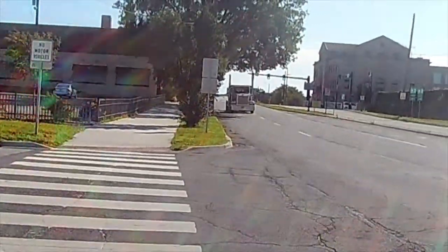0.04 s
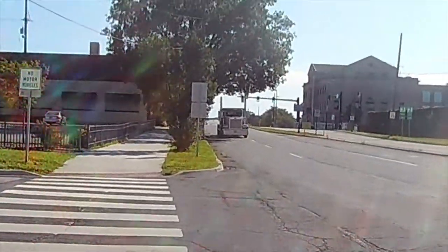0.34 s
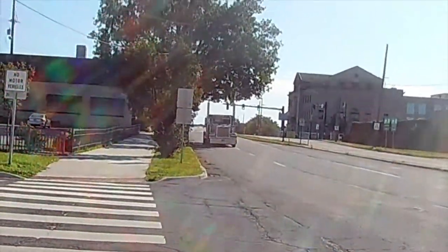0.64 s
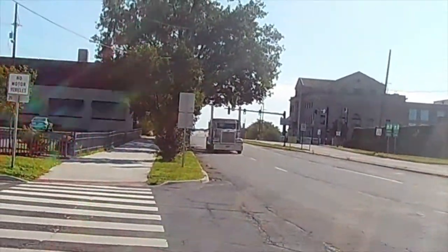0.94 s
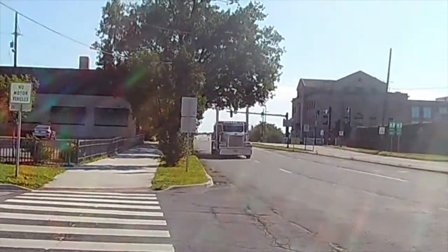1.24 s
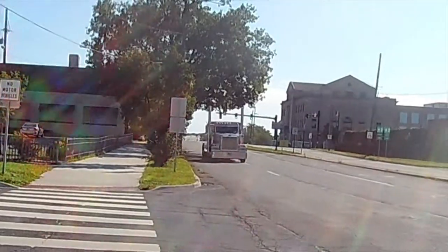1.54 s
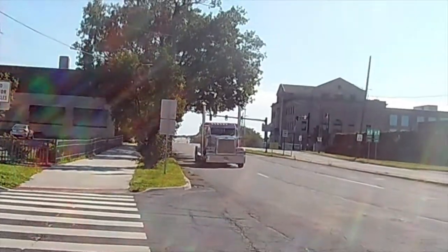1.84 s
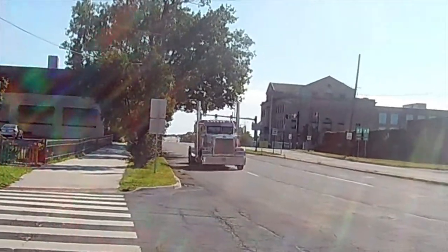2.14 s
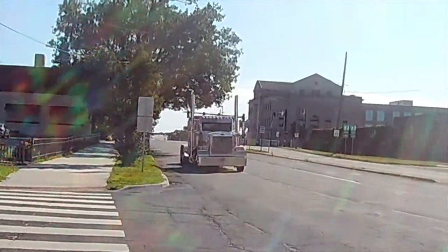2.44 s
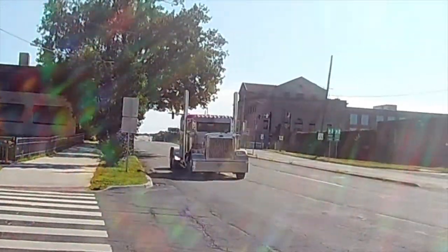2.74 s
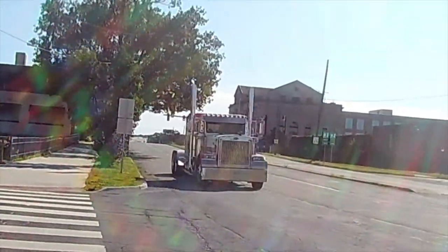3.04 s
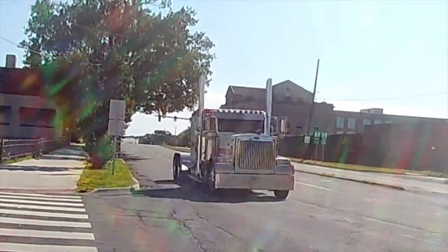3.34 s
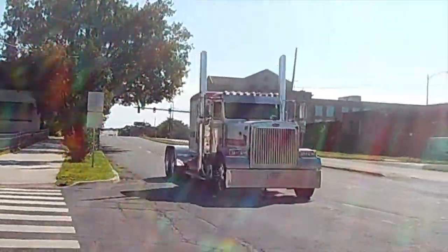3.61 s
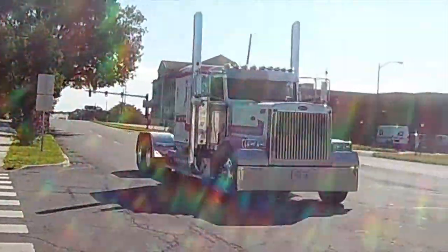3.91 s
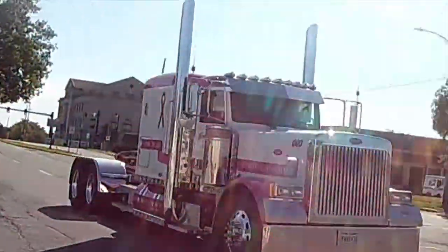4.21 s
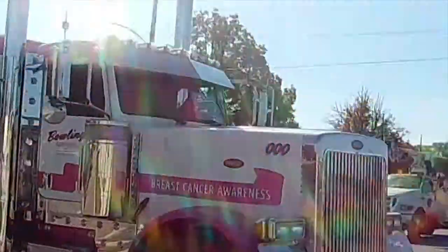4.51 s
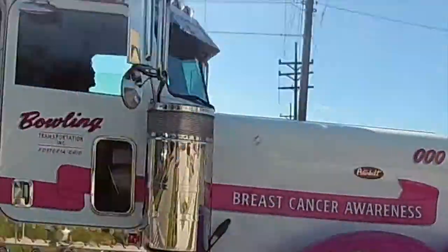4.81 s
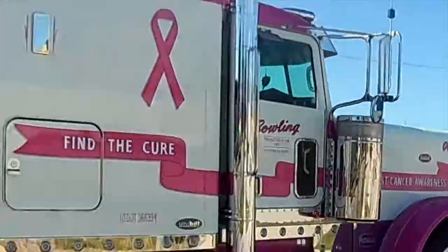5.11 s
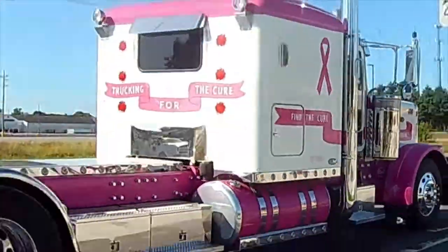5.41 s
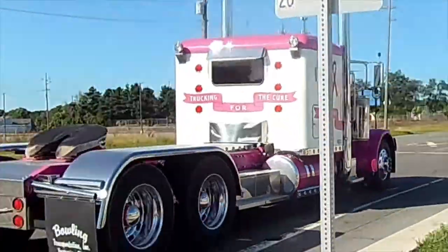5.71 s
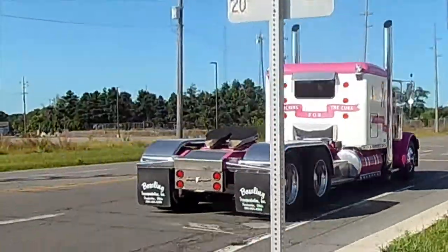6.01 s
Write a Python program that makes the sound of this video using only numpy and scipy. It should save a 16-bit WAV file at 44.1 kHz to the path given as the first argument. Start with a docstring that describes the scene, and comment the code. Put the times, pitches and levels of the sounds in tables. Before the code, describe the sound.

A diesel semi-truck approaches, gives one long, harshly distorted air horn blast, and drones past close by.

```python
"""A town road between house fronts, one microphone about 3.5 m from the path of a semi-truck.
The truck drives up and passes, its six-cylinder diesel droning over tyre roar and a thin turbo whistle.
Just before it draws level it sounds a three-trumpet air horn, so loud that the microphone overloads
into a harsh, buzzing chord; a hollow howl follows with the rear wheels. Earlier a far car gives one
short toot and there is a brief, high squeak. Light wind bumps the microphone."""
import sys
import numpy as np
from scipy import signal
from scipy.fft import rfft, irfft, next_fast_len
from scipy.io import wavfile

SR = 44100
rng = np.random.default_rng(int(sys.argv[2]) if len(sys.argv) > 2 else 0)


def dump_mix(stems):
    """Bounce the given channels to the path in sys.argv[1] as a 16-bit WAV at rate SR."""
    frames = np.atleast_2d(stems).T  # one column per channel
    limited = np.clip(frames, -1, 1)  # hard clip at full scale
    pcm = np.round(limited * 32767).astype(np.int16)
    wavfile.write(sys.argv[1], SR, pcm)


N = 267246
TIME = np.arange(N) / SR
PASS_S, SPEED_M_PER_S, DISTANCE_M = 4.638, 10.97, 3.46   # the cab is abreast and closest at PASS_S
VALVE_OPENS_S, VALVE_CLOSES_S, RELEASE_S = 3.553, 4.805, 0.083   # the horn's air supply
WHISTLE_WANDER = .01   # share of the pitch


def from_db(db):
    """Decibels to gain."""
    return 10 ** (np.asarray(db) / 20)


def rms_one(x):
    """Scale to unit power."""
    return x / np.sqrt(np.mean(x ** 2) + 1e-20)


def in_time(rows):
    """Each column of a timed curve at every sample."""
    times_s, *columns = np.transpose(rows)
    return [np.interp(TIME, times_s, column) for column in columns]


def at_hz(points, hz):
    """Read a spectrum on a log-frequency axis."""
    points_hz, db = np.transpose(points)
    return np.interp(np.log(np.maximum(hz, 1)), np.log(points_hz), db)


def coloured(x, spectrum):
    """Give a sound a smooth colour."""
    size = next_fast_len(N + 4096)
    bins_hz = np.arange(size // 2 + 1) * SR / size
    return irfft(rfft(x, size) * from_db(at_hz(spectrum, bins_hz)), size)[:N]


def noise(spectrum):
    """Coloured noise of unit power."""
    return rms_one(coloured(rng.standard_normal(N), spectrum))


def band(x, low_hz, high_hz):
    """Butterworth band-pass."""
    return signal.sosfilt(signal.butter(3, [low_hz, high_hz], "band", fs=SR, output="sos"), x)


def drift(rate_hz):
    """A smooth random wander with spread 1."""
    step = 40   # samples
    pole = np.exp(-2 * np.pi * step * rate_hz / SR)
    white = rng.standard_normal(N // step + 2002)
    slow = signal.lfilter([1], [1, -2 * pole, pole * pole], white)[2000:]
    return np.interp(np.arange(N) / step, np.arange(len(slow)), rms_one(slow))


def turning(hz):
    """Phase of an oscillation with a moving frequency and a random start."""
    return 2 * np.pi * (np.cumsum(hz) / SR + rng.random())


def tone(phase, db):
    """A sine with the given rms level."""
    return np.sqrt(2) * from_db(db) * np.sin(phase)


def whistle(hz, blur_hz):
    """A flickering, narrow band of noise around a slightly unsteady pitch."""
    phase = turning(hz * (1 + WHISTLE_WANDER * drift(6)))
    narrow = signal.butter(2, blur_hz, fs=SR, output="sos")
    in_phase, quadrature = rms_one(signal.sosfilt(narrow, rng.standard_normal((2, N))))
    return in_phase * np.cos(phase) + quadrature * np.sin(phase)


def microphone_hiss(level_db=-71):
    """The microphone's own faint noise floor."""
    # hiss spectrum: frequency_hz, density_db
    colour = [(100, 2.5), (5000, -0.5), (7000, -5), (9000, -3), (15000, 7)]
    return from_db(level_db) * noise(colour)


def wind(gain_db=7.0):
    """Wind on the microphone: a low flutter with a few sharper buffets."""
    # strength of the flutter: time_s, relative_db
    strength = [(0.08, -38), (0.54, -40.5), (0.62, -37), (1.78, -42), (2.37, -38.5), (4.32, -31),
                (4.88, -33), (5.01, -44), (6.0, -34.5)]
    # buffets: peak_s, level_db, width_s
    buffets = [(0.131, -32.5, 0.035), (0.681, -32.5, 0.022), (0.746, -31.5, 0.02), (0.83, -41, 0.02),
               (0.913, -33, 0.035), (1.312, -31, 0.014), (1.99, -31, 0.071), (2.162, -35, 0.032)]
    # spectra of flutter and buffets: frequency_hz, density_db
    flutter_colour = [(20, -5), (45, 15.5), (70, 13.5), (120, 6), (200, -1.5), (400, -26), (1200, -55),
                      (4000, -87)]
    buffet_colour = [(30, -16), (70, -19), (130, 17), (250, 5.5), (450, 3.5), (800, -20), (2000, -45),
                     (5000, -90)]
    flutter = from_db(in_time(strength)[0] + gain_db) * noise(flutter_colour)
    bumps = sum(from_db(db) * np.exp(-.5 * ((TIME - s) / width) ** 2) for s, db, width in buffets)
    return flutter + bumps * noise(buffet_colour)


def far_toot(centre_s=1.195, half_length_s=.035, pitch_hz=500):
    """A tap on a distant car horn: one note and its octave."""
    phase = 2 * np.pi * pitch_hz * TIME
    gate = np.exp(-((TIME - centre_s) / half_length_s) ** 4)
    return gate * (tone(phase, db=-39.5) + tone(2 * phase, db=-41.5))


def ticks(decay_s=0.0011):
    """Tiny dry, bright clicks, most of them as the horn cuts off."""
    # clicks: start_s, level_db
    clicks = [(0.098, -41), (4.804, -25), (4.84, -27), (4.846, -28), (4.849, -25)]
    # their spectrum: frequency_hz, density_db
    colour = [(300, -12), (2000, -8.5), (5000, -1), (8000, -4), (15000, -13)]
    envelope = sum(from_db(db) * (TIME >= s) * np.exp(-np.maximum(TIME - s, 0) / decay_s)
                   for s, db in clicks)
    return envelope * noise(colour)


def squeak(start_s=1.817, pitch_hz=4950, rise_s=.02, hiss_db=-55, hiss_lag_s=.065, hiss_width_s=.042):
    """A brief, rasping squeak inside a swell of hiss that outlasts it."""
    # hiss spectrum: frequency_hz, density_db
    colour = [(2000, -25), (3200, -8), (4400, 0), (4900, 8), (5500, -25)]
    age = np.maximum(TIME - start_s, 0) / rise_s
    phase = turning(pitch_hz * (1 + WHISTLE_WANDER * drift(60)))
    rasp = tone(phase, db=-50) * (1 + .55 * drift(90))
    swell = np.exp(-.5 * ((TIME - start_s - hiss_lag_s) / hiss_width_s) ** 2)
    return age * np.exp(1 - age) * rasp + swell * from_db(hiss_db) * noise(colour)


def rear_howl():
    """A hollow, slowly rising howl that comes out as the rear wheels go by."""
    # course of the howl: time_s, pitch_hz, level_db
    course = [(4.9, 270, -50), (5.25, 275, -38), (5.57, 286, -30), (5.95, 305, -34), (6.06, 310, -52)]
    pitch_hz, level_db = in_time(course)
    return from_db(level_db) * whistle(pitch_hz, blur_hz=10)


def turbo(strands_db=-1.0, halo_db=2.5, flicker_db=5):
    """The turbocharger: thin, flickering strands of whistle in a halo of air, climbing with the boost."""
    # course of the whistle: time_s, pitch_hz, relative_db
    course = [(0, 4290, -70.5), (1.72, 4190, -68.5), (2.0, 4300, -64), (2.45, 4370, -65.5),
              (2.82, 4640, -59.5), (2.92, 4800, -64), (3.08, 4950, -59.5), (3.25, 4980, -64),
              (3.5, 5130, -58), (3.9, 5020, -60), (5.25, 5280, -55), (6.06, 4430, -60)]
    # its strands: pitch_ratio, relative_db
    strands = [(.955, -7), (1, 1), (1.04, -8)]
    pitch_hz, course_db = in_time(course)
    thin = 0
    for ratio, db in strands:
        strand = from_db(db) * whistle(ratio * pitch_hz, blur_hz=28)
        thin += strand * from_db(flicker_db * np.tanh(drift(7)))
    halo = whistle(pitch_hz, blur_hz=280)
    return from_db(course_db + strands_db) * thin + from_db(course_db + halo_db) * halo


def passing():
    """Spreading loss from the closest point (dB), and how the truck faces us (1 coming, -1 going)."""
    ahead_m = SPEED_M_PER_S * (PASS_S - TIME)
    range_m = np.hypot(ahead_m, DISTANCE_M)
    return 20 * np.log10(DISTANCE_M / range_m), ahead_m / range_m


def truck_level(abreast_db, rear_db, falloff):
    """Level of a part of the truck: it follows the distance and gains up to rear_db from behind."""
    spread_db, facing = passing()
    return abreast_db + falloff * spread_db - rear_db * facing


def crankshaft(firing_hz=80.7, doppler_share=.0225, stacks_pass_s=5.05, rev_share=.013, rev_s=2.6):
    """Crank phase as heard: the engine gathers speed, then drops in pitch as the exhaust stacks go by."""
    doppler = 1 - doppler_share * np.tanh((TIME - stacks_pass_s) / .24)
    revs = 1 - rev_share * np.maximum(1 - (TIME / rev_s) ** 2, 0)
    return turning(firing_hz * doppler * revs * (1 + .002 * drift(6))) / 3   # three firings a turn


def roar(crank, rumble_db, roar_db, clatter=0.025, throb=0.074):
    """Tyres, fan and engine block; combustion knock pulses the upper part."""
    # the truck's spectrum from the front and from the side: frequency_hz, density_db
    front = [(200, -1.5), (265, -8.5), (330, -7.5), (500, -10.5), (800, -9.5), (1100, -12.5), (1330, -9.5),
             (1550, -14), (1950, -15.5), (2400, -22), (3300, -38.5), (4600, -44.5), (6800, -44.5),
             (7900, -55), (9500, -44), (15000, -55)]
    flank = [(200, -26), (275, 1), (430, -4.5), (540, -2), (680, -6.5), (1000, -10), (1400, -11),
             (1900, -16), (2500, -31), (3400, -40.5), (4400, -37), (5700, -34.5), (8000, -49.5),
             (9300, -44), (13000, -56.5)]
    side = np.clip((TIME - 3.7) / 2.0, 0, 1)   # the flank comes round to the microphone
    knock = 1 + clatter * np.cos(3 * crank) + throb * np.cos(crank)
    out = 0
    for colour, share in ((front, 1 - side), (flank, side)):
        rumble = from_db(rumble_db - 3.5) * rms_one(band(noise(colour), 187, 528))
        rush = from_db(roar_db + 2.5) * rms_one(band(noise(colour), 597, 17000))
        out += np.sqrt(share) * (rumble + knock * rush)
    return out


def exhaust(crank, rumble_db, uneven_db=-6.0, waver_db=4.5, throb_share=.3):
    """Three firings a turn give the drone; unequal cylinders fill in the other crank orders."""
    # boom at twice the firing rate, coming and going: time_s, level_db
    boom_coming = [(0.1, -35), (0.42, -34.5), (0.6, -31), (0.9, -33), (0.99, -40.5), (1.08, -31.5),
                   (1.5, -34), (2.05, -38), (2.4, -33), (2.95, -28), (3.5, -29)]
    boom_going = [(4.55, -27.5), (4.8, -16), (4.92, -14), (5.16, -17.5), (5.3, -23), (5.39, -23.5),
                  (5.5, -38), (5.721, -43), (5.95, -32)]
    # weaker orders: crank_multiple, relative_db
    orders = [(2, -24), (4, -14), (5, -6.5), (7, -29.5), (8, -8), (9, -7.5), (10, -3.5), (11, -7.5),
              (12, -14), (13, -11.5), (14, -20.5)]
    drone_db = truck_level(abreast_db=-25.5, rear_db=0.0, falloff=0.57)
    boom_db, = in_time([*boom_coming, *boom_going])
    firing = 3 * crank
    out = tone(firing + .5 * drift(2.3), drone_db + 0.98 * drift(8.1))
    throb = 1 + throb_share * np.cos(crank)
    out += throb * tone(2 * firing + 0.08 * drift(18), boom_db + .7 * drift(23))
    for order, db in orders:
        phase = order * crank + 2 * np.pi * rng.random() + 0.5 * drift(4.4)
        out += tone(phase, rumble_db + uneven_db + db + waver_db * drift(4.9))
    return out


def street(x):
    """The direct sound plus dull, late copies thrown back by the house fronts."""
    # reflections: delay_s, gain_db
    echoes = [(.047, -22), (.083, -23), (.139, -38), (.21, -34)]
    dull = band(x, 170, 4700)
    return x + sum(from_db(db) * np.interp(TIME - delay, TIME, dull, left=0) for delay, db in echoes)


def blast(attack_s=0.043, bite_s=0.11, bite_off_s=.012, blare_db=2, blare_s=0.23):
    """Air pressure and the truck's position set the horn's gain, brassiness and treble slope."""
    spread_db, facing = passing()
    since_s = np.maximum(TIME - VALVE_OPENS_S, 0)
    closed_s = np.maximum(TIME - VALVE_CLOSES_S, 0)
    pressure = (1 - np.exp(-(since_s / attack_s) ** 2)) * np.exp(-(closed_s / RELEASE_S) ** 2)
    # the diaphragms take longer to reach their full edge, and lose it at once as the valve closes
    edge = (1 - np.exp(-(since_s / bite_s) ** 2)) * np.exp(-(closed_s / bite_off_s) ** 2)
    gain_db = 6.5 + spread_db + 7.0 * facing   # louder ahead of the bells
    slope_db_per_octave = -9 + 1.3365 * gain_db - 6 * (1 - edge)
    first_gush = np.exp(-(since_s / blare_s) ** 2)
    brass_db = -20.5 + 3 * facing + blare_db * first_gush
    return pressure * from_db(gain_db), brass_db, slope_db_per_octave


def trumpet(air, swells, brass, pitch_hz, sag_hz_per_s, start_sharp, swell_db):
    """A diaphragm chops the air into rasping puffs; low partials swell and fade, upper ones flutter."""
    settle_s, jitter, flutter_share, scatter = .105, .00039, .0025, .77
    formant_hz, dispersion_rad = 1440, .2   # the bell colours and smears each puff
    _, brass_db, slope_db_per_octave = blast()
    since_s = np.maximum(TIME - VALVE_OPENS_S, 0)
    slide = 1 + start_sharp * np.exp(-(since_s / settle_s) ** 2)
    phase = turning((pitch_hz - sag_hz_per_s * since_s) * slide * (1 + jitter * drift(38.5)))
    sounding = slice(int(VALVE_OPENS_S * SR), int((VALVE_CLOSES_S + 4 * RELEASE_S) * SR))
    out = air * (.5 + .5 * np.cos(phase)) ** 2
    for k in range(1, 16):
        if k <= len(swells):
            level_db = in_time(swells[k - 1])[0] + swell_db
            paths = 1
        else:
            octaves_above = max(0, np.log2(k * pitch_hz / formant_hz))
            level_db = brass_db + at_hz(brass, k) + slope_db_per_octave * octaves_above
            # reflections mix in and shake the partial's level and phase
            flutter_hz = flutter_share * k * pitch_hz
            paths = 1 + scatter * (drift(flutter_hz) + 1j * drift(flutter_hz))[sounding]
        partial_phase = k * phase[sounding] - dispersion_rad * k ** 2 + np.angle(paths)
        out[sounding] += np.abs(paths) * tone(partial_phase, level_db[sounding])
    return out


def air_horn(air_db=-3.5):
    """One valve feeds three trumpets, which start sharp and settle into a chord, with a rush of air."""
    # each trumpet's lowest partials, swelling and fading as the truck moves: time_s, relative_db
    low_1 = [(3.61, -17), (3.85, -19), (4.08, -21.5), (4.3, -16.5), (4.536, -17), (4.726, -9), (4.786, -22),
             (4.86, -9)]
    low_2 = [(3.61, -13.5), (3.874, -9.5), (3.978, -12.5), (4.072, -25.5), (4.132, -15), (4.4, -5),
             (4.79, -4.5), (4.815, -8.5), (4.88, -15)]
    low_3 = [(3.61, -30), (3.75, -23), (3.95, -15), (4.15, -19), (4.3, -23), (4.5, -19), (4.63, -29.5),
             (4.73, -11.5), (4.84, -26)]
    low_4 = [(3.575, -21), (3.62, -16), (3.68, -17), (3.84, -27), (4.0, -27), (4.3, -17), (4.6, -47.5),
             (4.72, -31), (4.84, -27)]
    low_5 = [(3.61, -24.5), (3.7, -13), (3.849, -26), (4.2, -34.5), (4.55, -41), (4.839, -33.5)]
    mid_1 = [(3.61, -15.5), (3.892, -18.5), (3.982, -25.5), (4.274, -19.5), (4.598, -32), (4.684, -13.5),
             (4.734, -35), (4.835, -6), (4.9, -10.5)]
    mid_2 = [(3.575, -10.5), (3.615, -25), (3.668, -11.5), (4.194, -7.5), (4.316, -7), (4.358, -24),
             (4.444, -26), (4.55, -18.5), (4.6, -12.5), (4.76, -13), (4.86, -19.5)]
    high_1 = [(3.61, -8), (3.836, -15), (3.996, -12), (4.12, -18), (4.19, -31), (4.27, -16), (4.53, -17),
              (4.67, -9), (4.785, -14), (4.82, -46)]
    high_2 = [(3.595, -15.5), (3.65, -25), (3.72, -17), (3.88, -20), (4.02, -15), (4.25, -19.5),
              (4.45, -19), (4.66, -20), (4.751, -34), (4.86, -32)]
    high_3 = [(3.609, -23.5), (3.78, -22), (3.9, -29.5), (4.049, -26), (4.621, -19.5), (4.72, -32),
              (4.84, -32)]
    # their brassy upper partials: pitch_multiple, relative_db
    low_brass = [(6, -15), (7, -19), (9, -19.5), (11, -26.5), (15, -25)]
    mid_brass = [(3, -7.5), (4, -9.5), (5, -14.5), (6, -17.5), (7, -31), (10, -25), (15, -26.5)]
    high_brass = [(4, -18.5), (5, -30), (6, -15.5), (7, -26.5), (10, -35), (15, -43)]
    # spectrum of the rushing air: frequency_hz, density_db
    air_colour = [(300, -17), (700, 4), (1300, -1.5), (2000, -10), (3000, -17.5), (5000, -21),
                  (8000, -17.5)]
    gain, brass_db, slope_db_per_octave = blast()
    rush = rms_one(band(noise(air_colour), 200, 8300))
    air = from_db(brass_db + slope_db_per_octave + air_db) * rush
    low = trumpet(air, [low_1, low_2, low_3, low_4, low_5], low_brass,
                  pitch_hz=324.1, sag_hz_per_s=1.7, start_sharp=.028, swell_db=-0.5)
    mid = trumpet(air, [mid_1, mid_2], mid_brass,
                  pitch_hz=401.8, sag_hz_per_s=1.3, start_sharp=.033, swell_db=0.9)
    high = trumpet(air, [high_1, high_2, high_3], high_brass,
                   pitch_hz=520.1, sag_hz_per_s=6.0, start_sharp=.039, swell_db=-0.54)
    return gain * (low + mid + high)


def scene():
    """The passing truck, its horn and the open air, in mono from the roadside."""
    crank = crankshaft()
    rumble_db = truck_level(abreast_db=-22.0, rear_db=4.5, falloff=0.66)
    roar_db = truck_level(abreast_db=-21.0, rear_db=3.0, falloff=0.88)
    truck = exhaust(crank, rumble_db) + roar(crank, rumble_db, roar_db)
    truck += turbo() + squeak() + rear_howl()
    return (truck + microphone_hiss() + street(air_horn()) + wind() + far_toot() + ticks())[None]


def record(dry, ceiling=0.8, hardness=27.0, low_cut_hz=67, port_hz=4400, top_cut_hz=15650):
    """The microphone overloads, squaring off the horn and adding sum and difference tones."""
    # microphone response after the overload: frequency_hz, gain_db
    response = [(100, 0.5), (2000, 0.5), (3500, -2), (5500, -3.5), (7500, -9.5), (11000, -11), (15000, -6)]
    squared = dry[0] / (1 + np.abs(dry[0] / ceiling) ** hardness) ** (1 / hardness)
    # the low cut tilts the flat tops; the microphone port rings briefly after each sharp edge
    tilted = signal.sosfilt(signal.butter(1, low_cut_hz, "high", fs=SR, output="sos"), squared)
    _, poles = signal.iirpeak(port_hz, Q=22, fs=SR)
    rippled = signal.lfilter(poles[::-1], poles, tilted)   # all-pass
    clipped = np.clip(coloured(rippled, response), -1, 1)
    top_cut = signal.ellip(10, .1, 80, top_cut_hz, fs=SR, output="sos")
    return signal.sosfilt(top_cut, clipped)[None]


dry = scene()
out = record(dry)
dump_mix(out)
```